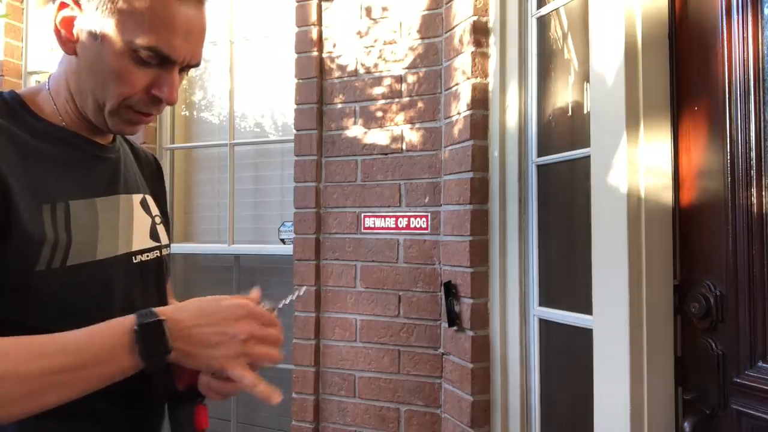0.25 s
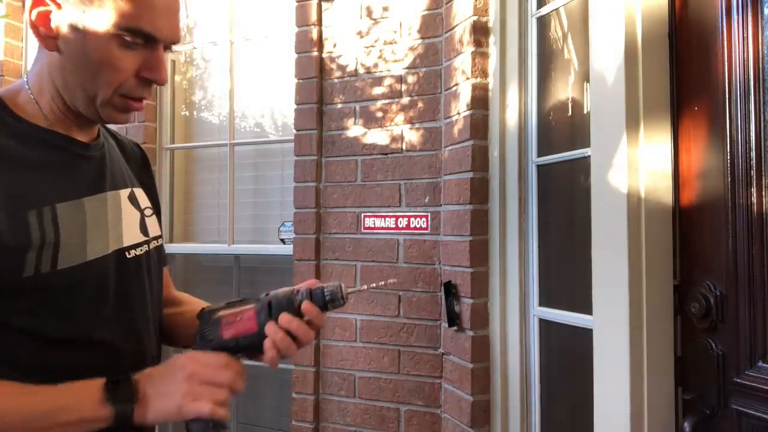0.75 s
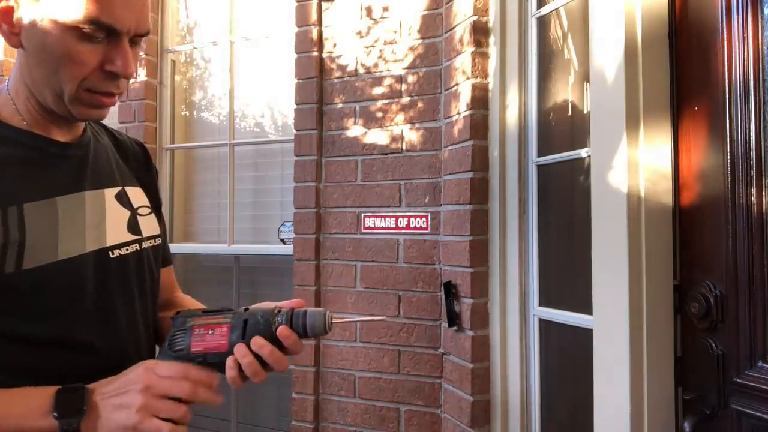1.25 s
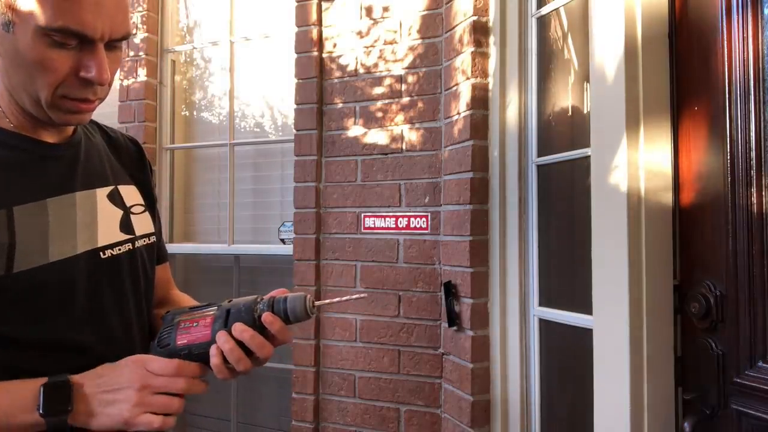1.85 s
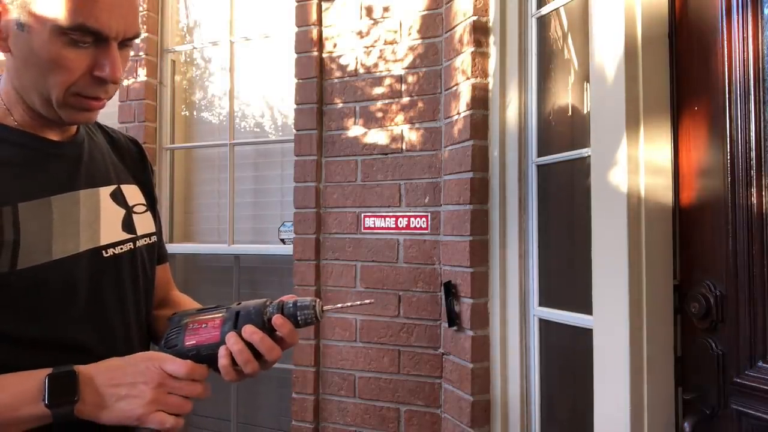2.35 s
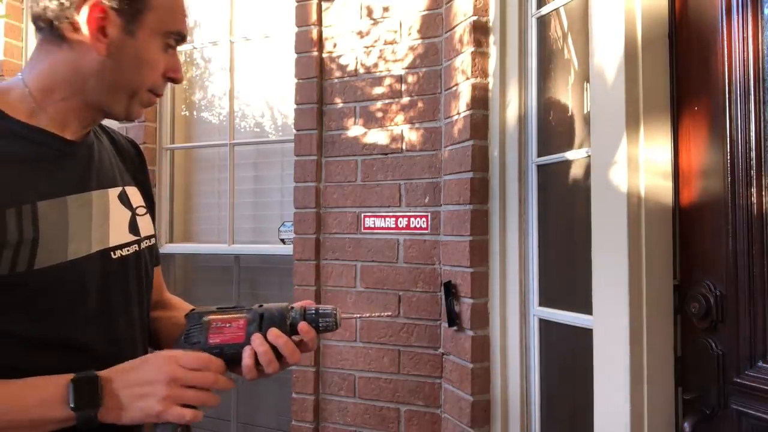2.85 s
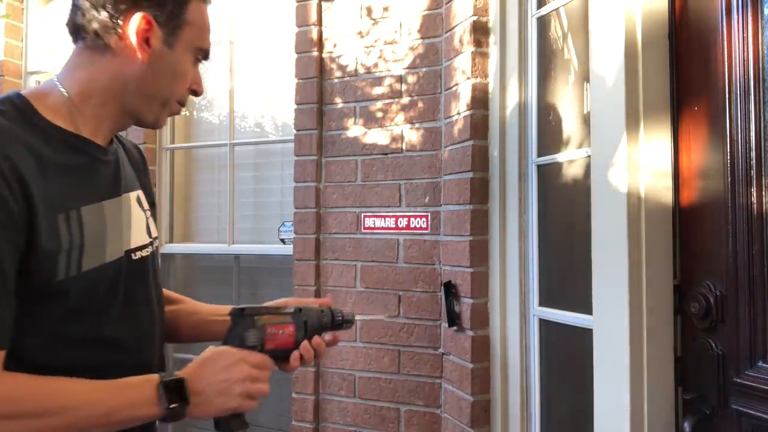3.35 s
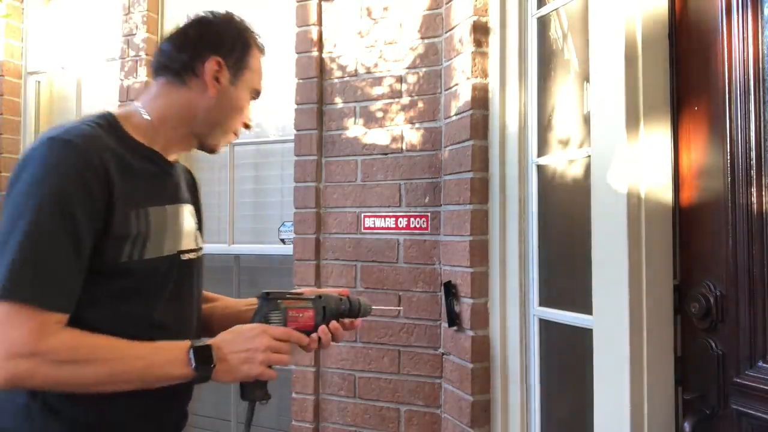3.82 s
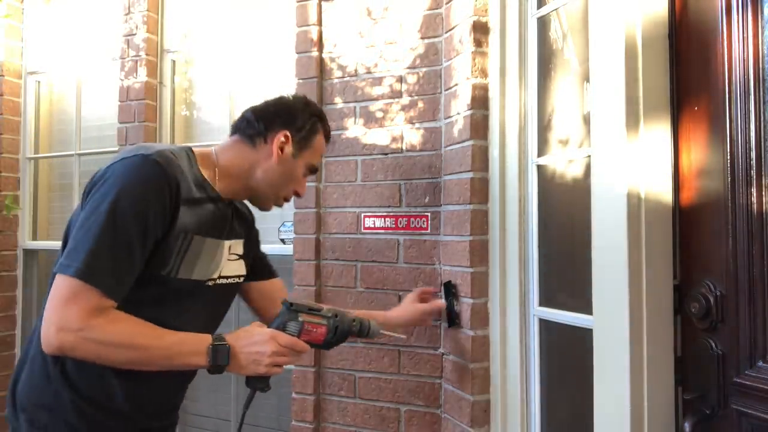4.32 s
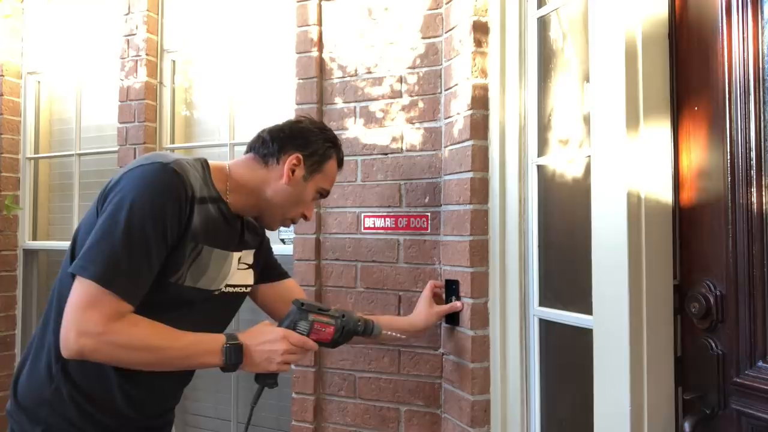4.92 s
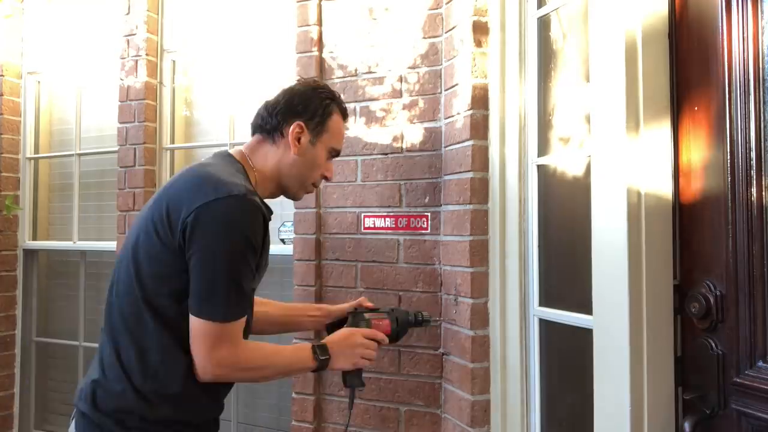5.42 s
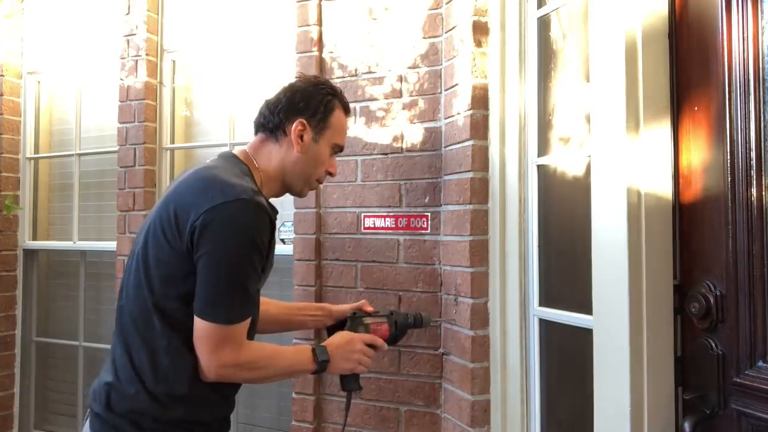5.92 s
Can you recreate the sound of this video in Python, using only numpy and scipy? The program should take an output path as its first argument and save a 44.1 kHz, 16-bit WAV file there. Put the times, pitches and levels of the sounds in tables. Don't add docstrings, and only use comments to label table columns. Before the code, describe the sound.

Brick porch, one close microphone, mono, with a short wall reflection and a low distant yard wash with wavering machine hum. From 0 to 0.8 s, hands rub lightly and small clicks tick. At 0.83 s the drill kicks weakly in quick low thuds, then at 1.15 s it bursts into a loud, grainy gear rattle with fan rush, brush fizz and a rising whine; from 1.25 s it coasts downward, fading by about 2.45 s. At 2.92 s a sharp click and hollow handle knock, then soft rubbing. A brief touch at 3.45 s, a dull knock at 3.66 s, then from 3.72 s a brighter, higher whining spin, slowly dropping and fading until 5.2 s. Clicks and juddering scuffs at 5.3 to 5.45 s. At 5.47 s the background abruptly drops. From 5.8 s a last shrill whir rises, still running at the end.

```python
import sys
import numpy as np
from scipy import signal
from scipy.io import wavfile
from scipy.ndimage import uniform_filter1d

SR = 44100
rng = np.random.default_rng(int(sys.argv[2]) if len(sys.argv) > 2 else 0)


def voltage_ratio(decibels):
    exponent = np.asarray(decibels, float) / 20
    return 10 ** exponent


def persist_wave(psi):
    counts = np.round(np.clip(psi, -1, 1) * 32767).astype(np.int16)
    wavfile.write(sys.argv[1], SR, np.atleast_2d(counts).T)


N = 272097
TIME = np.arange(N) / SR
SCENE_CHANGE_S = 5.466

# time in seconds, level in dB.
RATTLE_LEVEL = [
    [(0.82, -66), (0.86, -58), (0.89, -49.5), (0.95, -44.5), (0.974, -40), (1.088, -58.5), (1.14, -58)],
    [(1.145, -43.5), (1.181, -25), (1.213, -19), (1.257, -18.5), (1.353, -21.5), (1.923, -24.5),
     (2.291, -32), (2.447, -58.5), (2.58, -84)],
    [(3.37, -66), (3.41, -54), (3.472, -37.5), (3.64, -63)],
    [(3.7, -63), (3.734, -38), (3.78, -24.5), (3.85, -23), (4.25, -27), (4.844, -35), (5.098, -42),
     (5.246, -53.5), (5.3, -53)],
    [(5.78, -81), (5.8, -67), (5.85, -44.5), (5.904, -32.5), (6.074, -32.5), (6.17, -35.5)],
]
# time of top speed in seconds, top commutator pitch in Hz, coasting loss in Hz per s.
ROTOR = [(0.97, 700, 3000), (1.25, 4000, 3040), (3.5, 700, 2500), (3.86, 5950, 4270), (5.99, 6560, 5600)]
# fan rush at top speed and at the end in dB,
# brush fizz at top speed and at the end in dB, grip rumble once the tool is turned in dB.
AIR = [(1, -5, -12.5, -15, -30.5), (-7, -23, -7, -17.5, -16.5), (3, -6, -12, -9.5, -32),
       (-4.5, -19.5, -4.5, -13, -16.5), (-4, -4.5, -6.5, -5, -7)]
# commutator pitch in dB, its octave in dB.
WHINE = [(-40, -40), (-22, -12), (-40, -40), (-10.5, -17), (-10.5, -16)]
# frequency in Hz, gain in dB.
SING = [
    [(2200, -16), (2900, 1), (3600, 2), (4550, 1), (4800, -7), (5050, -1), (5900, 0), (6600, -8)],
    [(3400, -10), (4000, 0), (5200, 0), (5600, -11), (9000, -10), (10500, -2)],
]
# frequency in Hz, density in dB per Hz.
HOUSING = [(150, -52), (280, -9.5), (500, -3), (1000, -8), (1600, -5.5), (2500, -2), (3500, 0.5),
           (5200, -2.5), (6500, -5.5), (7900, -7.5), (8300, -11.5), (12000, -10), (15900, -12)]
# frequency in Hz, width in Hz, height over the rattle in dB.
HOUSING_RINGS = [
    [(650, 150, 7.5), (1910, 140, 4.5), (3300, 900, 4)],
    [(487, 290, -7.5), (580, 49, 6), (841, 100, 3.5), (2310, 52, 2.5), (3000, 100, 8.5), (3104, 110, 4.5),
     (4000, 370, 2.5), (4920, 580, 3.5), (10500, 760, 4)],
    [(1870, 420, 5.5), (2576, 550, 3), (3140, 150, 6.5), (3940, 290, 8.5)],
    [(698, 77, 15), (1820, 160, 7), (3000, 220, 7), (3800, 550, 5.5)],
    [(386, 91, -4), (727, 34, 0), (831, 150, 10), (1250, 350, 5), (3070, 400, 2.5), (5600, 210, 4),
     (10400, 300, -0.5)],
    [(910, 69, 7.5), (3320, 204, 12), (5490, 1200, 6.5), (7730, 170, 4.5), (10300, 200, 4.5)],
    [(372, 120, 3.5), (3410, 100, 11.5), (7860, 300, 3.5)],
    [(390, 33, 11.5), (707, 37, 14.5), (1300, 160, 5), (3370, 110, 5), (4700, 1500, 5)],
]
# first side, last side (indices of HOUSING_RINGS),
# start and end of the turn in seconds.
FACING = [(0, 0, 0, 1), (1, 2, 1.8, 2.15), (3, 3, 0, 1), (4, 5, 3.98, 4.15), (6, 7, 5.96, 6.08)]
# frequency in Hz, density in dB per Hz.
RUMBLE = [(120, -28), (230, -5), (300, -7.5), (450, -0.5), (950, -12), (1500, -9.5), (3000, -39)]
# time in seconds, peak in dB, treble against it in dB.
KICKS = [(0.833, -38.5, -30), (0.872, -36, -17), (0.8987, -24.5, -23), (0.913, -21, -23),
         (0.9304, -18, -19), (0.947, -25, -23), (0.9643, -20, -14.5), (0.981, -28.5, -20), (1.025, -36, 0),
         (1.147, -27.5, -4), (1.154, -28.5, -18), (1.1617, -16.5, -14), (1.179, -9, -19.5),
         (3.4317, -26, -12), (3.4662, -23, -25), (3.487, -30, -27), (3.4995, -24.5, -27), (3.716, -29, -8),
         (3.73, -25, -23), (3.7473, -24.5, -13.5), (5.7952, -43, -16), (5.8112, -37, -25),
         (5.828, -33.5, -28), (5.8444, -45, -16)]
# time in seconds, peak in dB, pitch in Hz, treble against it in dB.
CLICKS = [(0.0165, -54, 3000, -4), (0.298, -59.5, 6960, 13), (0.315, -40, 3300, -18), (0.53, -55, 4000, 0),
          (0.612, -40.5, 3980, -8), (0.721, -65, 7040, 18.5), (0.7926, -43, 4000, -8),
          (0.8644, -36.5, 7040, 2), (1.11, -47, 6000, -8), (1.118, -52.5, 5900, 3), (2.468, -69, 7040, 10),
          (2.781, -60, 6550, -10), (2.9208, -26, 4040, 1), (2.9252, -25, 2120, 0), (3.374, -43, 2930, -12),
          (3.387, -47.5, 6000, 2), (3.416, -50, 5000, -6), (3.6556, -30.5, 2300, -24),
          (3.6625, -39.5, 3000, -24), (3.68, -43, 6000, 1), (5.222, -46, 5000, 3), (5.3126, -44, 5170, -6),
          (5.331, -44, 5200, 3), (5.387, -48, 5000, 0), (5.439, -58, 4000, -6), (5.459, -51.5, 5000, 1),
          (5.7497, -49.5, 1830, -25), (5.76, -68, 6000, 4)]
# time in seconds, level in dB.
KNOCKS = [(0.315, -42), (2.9255, -24.5), (3.374, -41), (3.387, -40), (3.6558, -26), (3.68, -55)]
# loudest moment in seconds, level in dB, swell in seconds, dying in seconds.
HANDS = [(0.044, -65, .1, 0.023), (0.16, -59, .15, .2), (0.33, -65, .02, 0.27), (0.56, -65, 0.093, .15),
         (0.63, -68, .02, 0.082), (0.776, -57.5, 0.2, 0.15), (2.786, -61.5, .09, 0.052),
         (2.922, -40.5, 0.014, 0.071), (2.96, -49, 0.11, 0.25), (3.162, -65, 0.058, 0.19),
         (3.29, -59.5, 0.16, .25), (3.4, -65, .08, .05), (3.69, -51, 0.11, .08),
         (5.335, -46.5, 0.061, 0.061), (5.4, -59, 0.43, .3)]
# frequency in Hz, density in dB per Hz.
RUSTLE = [(710, -26.5), (1200, -9.5), (1570, -8.5), (1810, -2), (3070, -3), (5940, -8), (8490, -16),
          (14700, -17), (15900, -18)]
# frequency in Hz, width in Hz, height in dB.
SCRAPE_RINGS = [(5200, 320, 13), (7500, 1300, 12), (2200, 2200, -4)]
# loudest moment in seconds, level in dB, swell in seconds, dying in seconds.
SCUFF = [
    (5.318, -34.5, .012, 0.08),
    (5.372, -37.5, .05, 0.11),
]
# frequency in Hz, width in Hz, level in dB.
SCUFF_RINGS = [(410, 36, 0), (680, 40, -18), (480, 50, -11), (320, 60, -11), (450, 300, -29)]
# frequency in Hz, density in dB per Hz.
YARD = [(13, -49.5), (22, -15.5), (76, -10), (160, -2), (242, -8.5), (285, -8), (431, -13.5), (932, -17.5),
        (1410, -22.5), (2380, -32.5), (7560, -44), (8440, -49.5), (15900, -49.5)]
# frequency in Hz, width in Hz, height over the yard in dB.
HUM = [(57, 16, 14), (96, 16, 9)]
# time in seconds, level in dB.
YARD_LEVEL = [(0, -49.5), (1, -47), (2, -50), (5.46, -49.5), (5.475, -60.5), (5.7, -65), (5.9, -58),
              (6.17, -53)]
MACHINE_HZ = [142.4, 168, 226.8]
# time in seconds, level in dB.
MACHINE_LEVEL = [
    [(0.0, -76), (0.6, -57), (1.0, -44.5), (1.3, -54), (1.77, -47.5), (2.68, -55), (3.05, -46.5),
     (3.44, -54), (3.61, -50), (3.9, -55.5), (4.23, -52), (4.81, -47.5), (5.46, -59)],
    [(0.0, -53), (0.58, -51.5), (1.2, -64), (1.63, -47), (1.9, -54), (2.68, -50.5), (2.95, -43),
     (3.46, -46), (3.88, -54.5), (4.97, -48), (5.28, -48.5), (5.4, -43), (5.46, -47), (5.475, -57),
     (5.56, -68)],
    [(0.0, -79), (0.58, -62), (1.1, -46.5), (1.77, -49.5), (2.68, -58), (2.95, -53.5), (3.46, -57.5),
     (4.23, -49.5), (4.81, -62), (5.46, -64)],
]


def tool():
    out = np.zeros(N)
    for row in zip(RATTLE_LEVEL, FACING, AIR, ROTOR, WHINE):
        add(out, *pull(*row))
    add_kicks(out)
    add_clicks(out)
    for s, db in KNOCKS:
        add(out, s, handle_knock(db))
    add_hands(out)
    add_scuff(out)
    return out


def pull(level, facing, air_db, rotor, whine_db):
    s, db = columns(level)
    t = s + np.arange(len(db)) / SR
    top_s = rotor[0]
    spin, hz = rotor_speed(t, rotor)
    linger_db = 0.61 * np.maximum(db.max() - db - 14.5, 0) * (t > top_s)
    marks = [s, top_s + 0.062, t[-1]]
    rush_db = np.interp(t, marks, [air_db[0] - 11, *air_db[:2]]) + linger_db
    fizz_db = np.interp(t, marks, [air_db[2] - 4, *air_db[2:4]]) - 0.74 * linger_db
    drive, lumps = gear_drive(hz)
    turned = np.interp(t, facing[2:], [0, 1])
    calm = np.clip(linger_db / 14, 0, 1)
    rush, rattle, fizz = housing(drive, facing, turned, calm)
    whine = commutator_whine(spin, hz, whine_db)
    grip = evened(colour(rng.standard_normal(len(t)), RUMBLE))
    rumble = turned * voltage_ratio(air_db[4] + linger_db) * grip
    sound = rumble + rattle + voltage_ratio(rush_db) * rush + voltage_ratio(fizz_db) * fizz + lumps * whine * np.sqrt(2)
    return s, voltage_ratio(db) * sound


def rotor_speed(t, rotor):
    top_s, top_hz, loss = rotor
    spin = np.clip((t - t[0]) / (top_s - t[0]), 0, 1) ** 0.9
    coasting = spin * top_hz - loss * np.maximum(t - top_s, 0)
    return spin, np.maximum(coasting, 200)


def gear_drive(hz):
    n = len(hz)
    chance = np.clip((1500 + 1.2 * hz) / SR, 0, 1)
    strength = voltage_ratio(3.5 * np.minimum(rng.exponential(1, n), 4))
    taps = strength * (rng.random(n) < chance) * rng.choice([-1., 1.], n)
    taps = evened(taps / np.sqrt(chance))
    lumps = voltage_ratio(drift(n, 200))
    return patchy(lumps * taps + 0.8 * rng.standard_normal(n), depth_db=1.3), lumps


def housing(drive, facing, turned, calm):
    first = np.array(split(colour(drive, HOUSING, HOUSING_RINGS[facing[0]])))
    last = np.array(split(colour(drive, HOUSING, HOUSING_RINGS[facing[1]])))
    bare = np.array(split(colour(drive, HOUSING)))
    return (1 - calm) * ((1 - turned) * first + turned * last) + calm * bare


def commutator_whine(spin, hz, whine_db):
    shake = 1 + .004 * drift(len(hz), 200)
    angle = 2 * np.pi * np.cumsum(hz * shake) / SR
    whine = np.zeros(len(hz))
    for k, (db, sing) in enumerate(zip(whine_db, SING), start=1):
        whine += voltage_ratio(db + np.interp(k * hz, *np.transpose(sing))) * np.sin(k * angle)
    return whine * spin ** 6 * voltage_ratio(2.2 * drift(len(hz), 1500))


def add_kicks(out):
    for s, db, treble_db in KICKS:
        side = 3 * (int(s > 3) + int(s > 5.5))
        add(out, s, burst(db, .045, treble_db, HOUSING_RINGS[side]))


def add_clicks(out):
    for s, db, hz, treble_db in CLICKS:
        add(out, s, burst(db, .085, treble_db, [(hz, 0.12 * hz, 11)]))


def burst(db, t60, treble_db, rings):
    t = np.arange(6000) / SR
    decay = voltage_ratio(-60 * t / t60) + 1.9 * voltage_ratio(-60 * t / .006)
    x = colour(rng.standard_normal(len(t)) * decay, RUSTLE, rings, size=2048)
    low, middle, high = split(x)
    return voltage_ratio(db) * (0.19 * low + middle + voltage_ratio(treble_db) * high) / abs(middle).max()


def handle_knock(db):
    t = np.arange(6000) / SR
    hz, t60, rise_s = 662, 0.037, 0.0052
    return voltage_ratio(db - 60 * t / t60) * np.sin(2 * np.pi * hz * t) * (1 - np.exp(-t / rise_s))


def add_hands(out):
    grains = rng.standard_normal(N) * voltage_ratio(1.2 * drift(N, 150))
    for row in HANDS:
        s, gain = stroke(*row)
        part = grains[round(s * SR):][:len(gain)]
        add(out, s, gain * evened(colour(part, RUSTLE, SCRAPE_RINGS if s > 5 else ())))


def add_scuff(out):
    judder_hz, depth = 52.8, 0.49
    for row in SCUFF:
        s, gain = stroke(*row)
        judder = 1 - depth * (np.arange(len(gain)) * judder_hz / SR % 1)
        slips = judder ** 2 * rng.standard_normal(len(gain))
        rung = np.zeros(len(gain))
        for hz, width, db in SCUFF_RINGS:
            rung += voltage_ratio(db) * resonate(resonate(slips, hz, width), hz, 2 * width)
        add(out, s, np.sqrt(np.mean(gain ** 2)) * evened(gain * rung))


def stroke(s, db, swell, dying):
    edge_db = db - 20
    start, level_db = columns([(max(s - swell, 0), edge_db), (s, db), (s + dying, edge_db)])
    return start, voltage_ratio(level_db[:max(round((SCENE_CHANGE_S - start) * SR), 1)])


def porch(x):
    t = np.arange(SR // 3) / SR
    wall_s, wall_db, t60, tail_db = .0031, -20, .2, -15
    echoes = rng.choice([-1., 1.], len(t)) * (rng.random(len(t)) < 2000 / SR)
    tail = signal.lfilter([1], [1, -.4], echoes * voltage_ratio(-60 * t / t60) * (t > .006))
    tail = voltage_ratio(tail_db) * tail / np.linalg.norm(tail)
    tail[0] = 1
    tail[round(wall_s * SR)] += voltage_ratio(wall_db)
    return signal.fftconvolve(x, tail / np.linalg.norm(tail))[:N]


def yard():
    wash = colour(rng.standard_normal(N + SR), YARD, HUM, size=32768)[SR:]
    low = signal.sosfiltfilt(signal.butter(2, 280, fs=SR, output="sos"), wash)
    upper = voltage_ratio(1.5 + 3 * (TIME > SCENE_CHANGE_S)) * (wash - low)
    wash = voltage_ratio(np.interp(TIME, *np.transpose(YARD_LEVEL))) * (low + upper) / np.std(low)
    for hz, rows in zip(MACHINE_HZ, MACHINE_LEVEL):
        start, level_db = columns(rows)
        waver = evened(resonate(rng.standard_normal(len(level_db)), hz, 9))
        tone = np.sqrt(2) * np.sin(2 * np.pi * hz * TIME[:len(waver)])
        add(wash, start, voltage_ratio(level_db) * evened(tone + .5 * waver))
    return wash


def evened(x):
    return x / np.sqrt(np.mean(x ** 2) + 1e-20)


def drift(n, smooth):
    return evened(uniform_filter1d(rng.standard_normal(n), smooth))


def add(mix, s, sound):
    part = mix[round(s * SR):][:len(sound)]
    part += sound[:len(part)]


def columns(rows):
    s, *values = np.transpose(rows)
    t = np.arange(s[0], s[-1], 1 / SR)
    return s[0], *(np.interp(t, s, v) for v in values)


def colour(x, spectrum, rings=(), size=8192):
    hz = np.abs(np.fft.fftfreq(size, 1 / SR))
    f, db = np.transpose(spectrum)
    gain = voltage_ratio(np.interp(np.log(hz + 1), np.log(f + 1), db))
    for centre, width, height_db in rings:
        gain = gain * (1 + (voltage_ratio(height_db) - 1) / (1 + (2 * (hz - centre) / width) ** 2))
    taps = np.fft.ifft(np.exp(np.conj(signal.hilbert(np.log(gain + 1e-5))))).real
    return signal.fftconvolve(x, taps[:size // 2])[:len(x)]


def split(x):
    parts = []
    for edge_hz, kind in [(1500, "low"), ([1500, 8000], "band"), (8000, "high")]:
        parts.append(evened(signal.sosfilt(signal.butter(4, edge_hz, kind, fs=SR, output="sos"), x)))
    return parts


def resonate(x, hz, width):
    turn = np.exp(2j * np.pi * np.cumsum(hz * np.ones(len(x))) / SR)
    r = np.exp(-np.pi * width / SR)
    return 2 * (turn * signal.lfilter([1 - r], [1, -r], x / turn)).real


def patchy(x, depth_db):
    z = signal.stft(x, nperseg=512, noverlap=384)[2]
    patches = uniform_filter1d(rng.standard_normal(z.shape), size=4, axis=0)
    patches = evened(uniform_filter1d(patches, size=14, axis=1))
    return evened(signal.istft(z * voltage_ratio(depth_db * patches), nperseg=512, noverlap=384)[1][:len(x)])


def scene():
    duck = np.interp(TIME, SCENE_CHANGE_S + np.array([0, .006, .2, .25]), [1, .05, .05, 1])
    mono = duck * porch(tool()) + yard()
    return np.array([mono, mono])


def top_cut(x):
    return signal.sosfilt(signal.butter(12, 16980, fs=SR, output="sos"), x)


def record(dry):
    rounded = np.tanh(dry / .9) * .9
    edge = signal.firwin(511, 15900, window=("kaiser", 9), fs=SR)
    finished = signal.oaconvolve(rounded, edge[None], "same")
    return top_cut(finished)


dry = scene()
out = record(dry)
persist_wave(out)
```